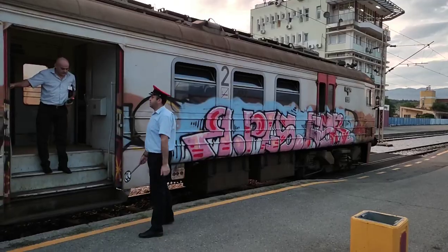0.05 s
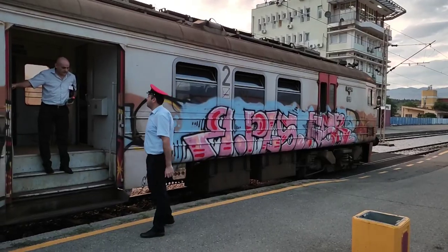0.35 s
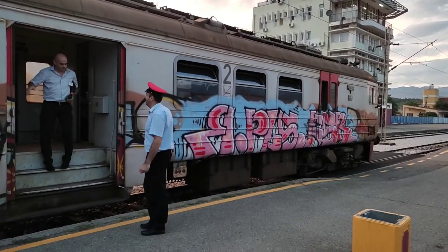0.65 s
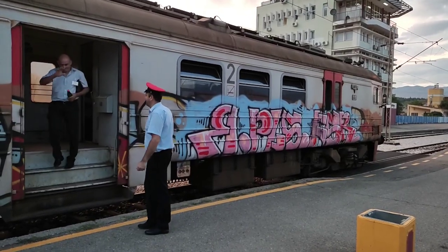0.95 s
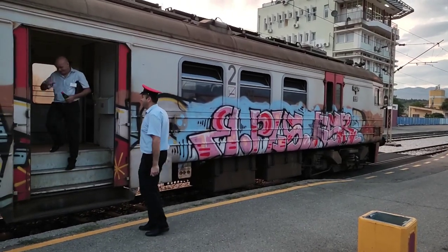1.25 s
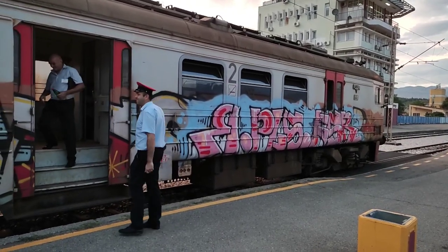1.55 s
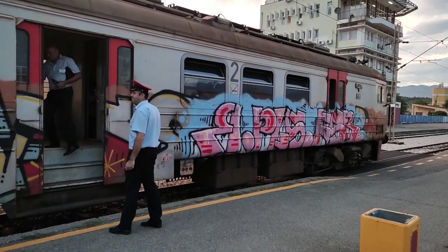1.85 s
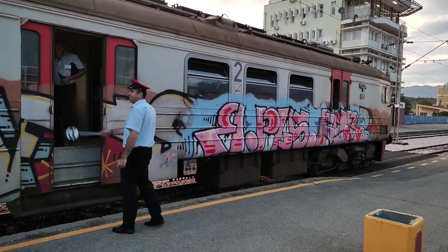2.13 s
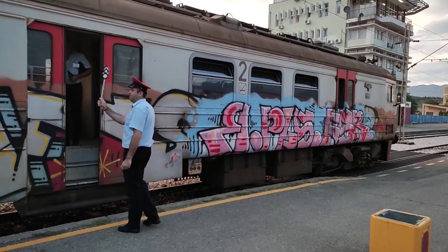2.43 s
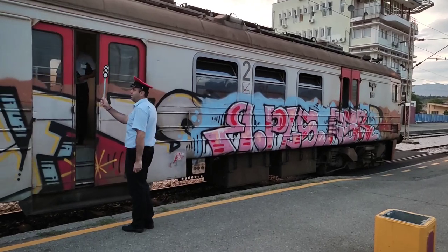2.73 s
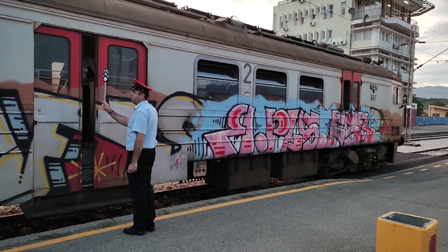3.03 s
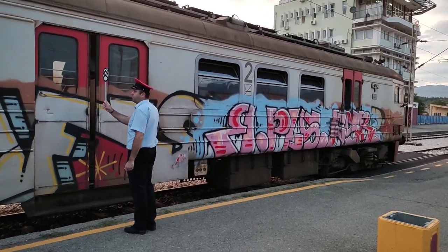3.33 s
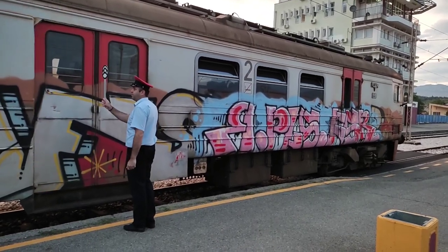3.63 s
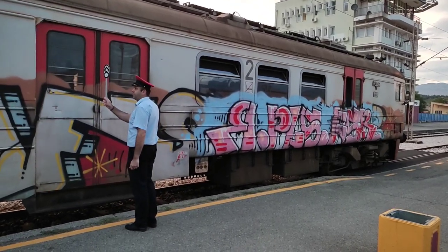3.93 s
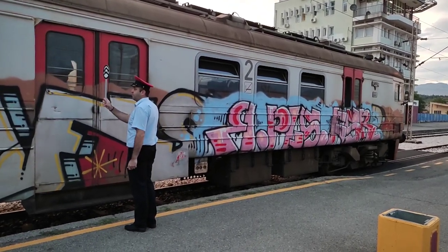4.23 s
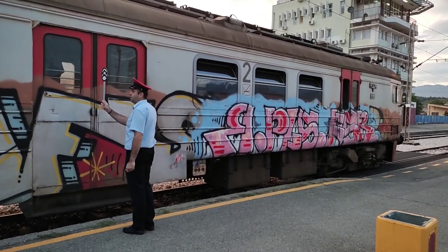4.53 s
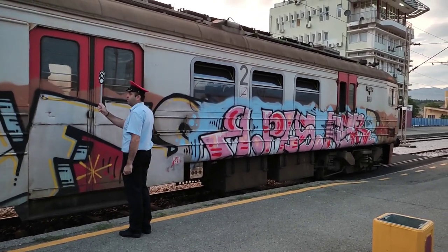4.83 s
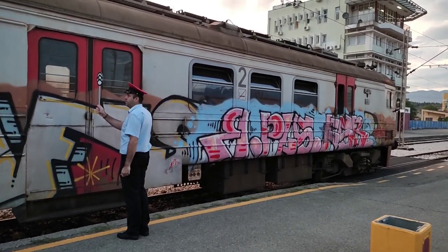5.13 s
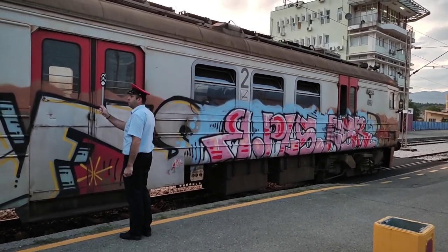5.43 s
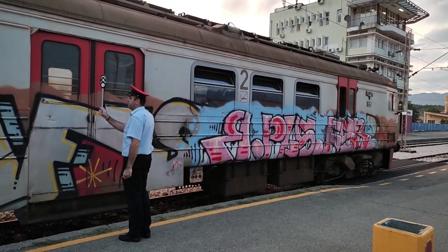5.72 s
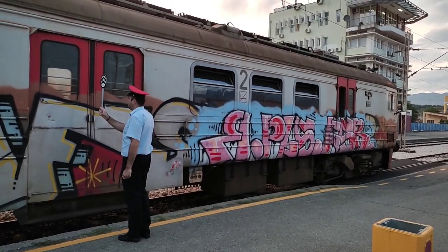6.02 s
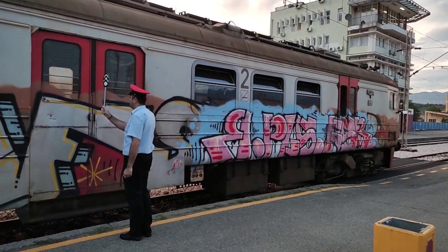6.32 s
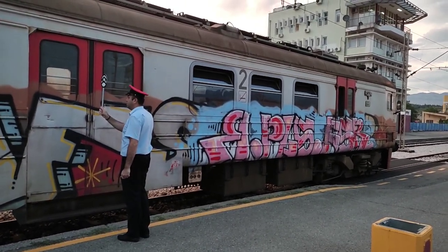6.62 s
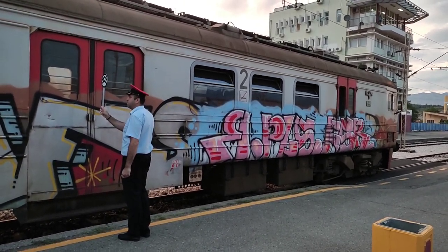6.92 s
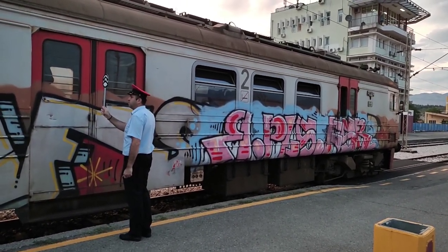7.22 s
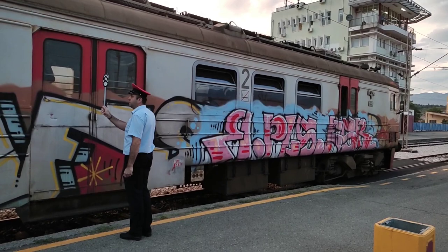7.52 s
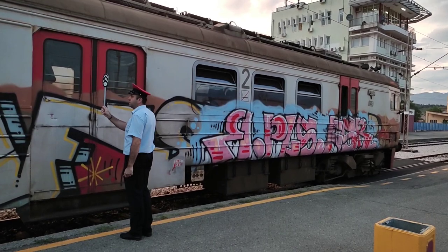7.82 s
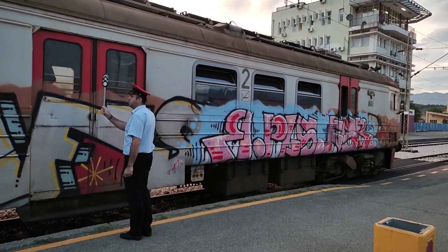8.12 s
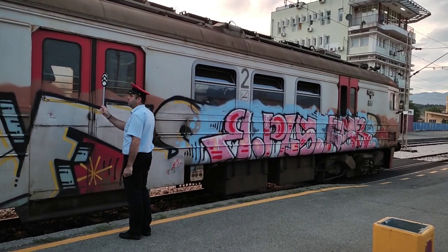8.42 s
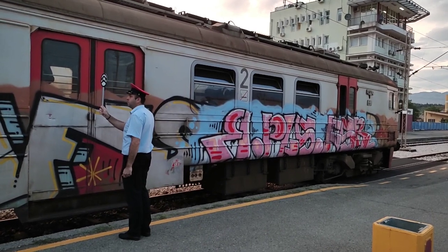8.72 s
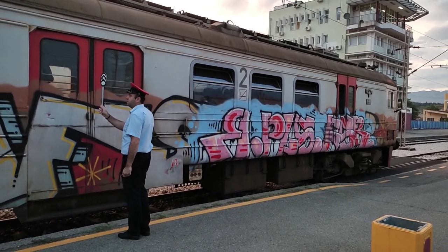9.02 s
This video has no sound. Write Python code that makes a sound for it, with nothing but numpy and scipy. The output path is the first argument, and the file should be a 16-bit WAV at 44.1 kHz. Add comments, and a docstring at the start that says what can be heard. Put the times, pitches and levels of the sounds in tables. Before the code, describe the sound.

An electric train idles with a throbbing hum and blower whine while its sliding doors hiss, squeak and bump shut.

```python
"""An electric railcar idles at an open platform, heard on one microphone a few metres away.
Four auxiliary motors at nearly the same speed beat against each other over a rumble; the electrical
gear buzzes, and a blower rushes through its ducts while its blades whine. The air-driven sliding
doors hiss, squeak along their track and bump shut, closing off the air noise from inside.
The vestibule floor thuds softly, and a thin whistle joins the blower later on."""
import sys
import numpy as np
from scipy import signal
from scipy.fft import irfft
from scipy.io import wavfile

SR = 44100
rng = np.random.default_rng(int(sys.argv[2]) if len(sys.argv) > 2 else 0)


def store_pcm(level_fs):
    """Save levels as 16-bit WAV."""
    pcm = np.round(np.clip(level_fs, -1, 1) * 32767).astype(np.int16)
    wavfile.write(sys.argv[1], SR, np.atleast_2d(pcm).T)


N = 399546
TIME = np.arange(N) / SR
FREQS = np.maximum(np.arange(N // 2 + 1) * SR / N, 1)


def from_db(db):
    """Decibels to gain."""
    return 10 ** (np.asarray(db) / 20)


def rms_one(x):
    """Scale to unit power."""
    return x / np.sqrt(np.mean(x ** 2) + 1e-20)


def in_time(rows):
    """Each column after the first (t/s), interpolated to every sample."""
    times, *columns = np.transpose(rows)
    return [np.interp(TIME, times, column) for column in columns]


def ramp(start_s, length_s):
    """Rises evenly from 0 to 1 and stays there."""
    return np.clip((TIME - start_s) / length_s, 0, 1)


def fade(start_s, db_per_s):
    """Full gain until a given moment, then a steady decay."""
    return from_db(-db_per_s * np.maximum(TIME - start_s, 0))


def swell(start_s, length_s):
    """A rounded rise and fall."""
    return np.sqrt(np.abs(np.sin(np.pi * ramp(start_s, length_s))))


def noise(gain):
    """Unit-power noise shaped by a gain at each frequency."""
    real, imaginary = rng.standard_normal((2, len(FREQS)))
    return rms_one(irfft((real + 1j * imaginary) * gain, N))


def coloured(spectrum):
    """Unit-power noise that follows a spectrum (f/Hz, relative level/dB) and falls away past its ends."""
    hz, db = np.transpose(spectrum)
    ends = np.minimum(1, FREQS / hz[0]) * np.minimum(1, hz[-1] / FREQS)
    return noise(from_db(np.interp(np.log(FREQS), np.log(hz), db)) * ends ** 2)


def resonant(hz, width_hz):
    """Noise gathered around one frequency."""
    return noise(1 / (1 + ((FREQS - hz) / width_hz) ** 2))


def drift(rate_hz):
    """A random wander of unit power, mostly slower than the given rate."""
    return resonant(0, rate_hz)


def sine(hz):
    """Unit-power tone on a steady or moving pitch."""
    return np.sqrt(2) * np.sin(2 * np.pi * (np.cumsum(hz * np.ones(N)) / SR + rng.random()))


def wavering(hz, unsteady, width_hz):
    """A clean tone mixed with narrow noise that makes it waver; unsteady runs from 0 to 1."""
    return np.sqrt(1 - unsteady ** 2) * sine(hz) + unsteady * resonant(hz, width_hz)


def blows(times, levels_db, t60, rise_s):
    """Envelope of a run of blows: each swells quickly on contact and dies away."""
    clicks = np.zeros(N)
    clicks[np.round(times * SR).astype(int)] = from_db(levels_db)
    fall, rise = from_db(-60 / (t60 * SR)), np.exp(-1 / (rise_s * SR))
    decays = signal.lfilter([1], [1, -fall], clicks + 1e-18)
    return signal.lfilter([1 - rise], [1, -rise], decays)


def struck(times, levels_db, modes, rise_s):
    """Blows set a body's clusters of modes ringing."""
    return sum(blows(times, levels_db + db, t60, rise_s) * resonant(hz, width)
               for hz, width, db, t60 in modes)


def motor_tones():
    """One motor tone sings out, swelling and sinking, among others that hold their pitch or waver."""
    # motor tones: f/Hz, level/dB, unsteadiness/0-1
    partials = [(42.2, -59, 0.5), (124, -44, 0.2), (124.2, -47, 0), (126.95, -41, 0.1), (129.6, -43, 0.3),
                (256.8, -50, 0.4), (389, -55, 0.3), (509.3, -56, 0.5), (687, -68.5, .3), (700, -67, 0.3),
                (826, -63.5, 0.8), (885, -65, 0), (1020, -65, 0.3), (1041, -59, 0.4), (1088, -68.5, 0.3),
                (2044, -64.5, 0.2), (2088, -65, 0.4), (2327, -64, 0.1)]
    # swell of the singing tone: t/s, level/dB
    singing_level = [(0, -54), (.75, -50), (1.08, -56.5), (1.55, -49.5), (1.87, -57.5), (2.12, -50),
                     (2.42, -58), (2.6, -53), (3.3, -55.5), (3.6, -51), (4.3, -54), (4.8, -59), (5.5, -53),
                     (6.2, -56.5), (6.95, -55), (7.9, -53.5), (8.2, -51.5), (9, -53.5)]
    tones = sum(from_db(db) * wavering(hz, unsteady, width_hz=2.8) for hz, db, unsteady in partials)
    return tones + from_db(in_time(singing_level)[0]) * sine(hz=681.7)


def motor_throb(in_step_s=8.2, flutter_db=0.66):
    """Four like motors slide in and out of step, so that their summed hum swells and cancels."""
    # hum as the speeds creep: t/s, then f/Hz for each of the four motors
    pitches = [(0, 252.03, 253.79, 254.2, 256.78), (2.25, 252.52, 253.57, 254.04, 256.68),
               (4.5, 252.28, 253.66, 254.33, 256.53), (6.75, 252.19, 253.73, 254.13, 256.76),
               (9, 252.35, 253.39, 254.41, 256.66)]
    # hum of each motor: level/dB
    levels = [-36.5, -36, -37, -38.5]
    cycles = np.cumsum(in_time(pitches), axis=1) / SR
    cycles = cycles - cycles[:, [round(in_step_s * SR)]] + rng.random()  # all four in phase here
    hums = np.sqrt(2) * np.sin(2 * np.pi * cycles)
    return from_db(flutter_db * drift(7.4)) * (from_db(levels) @ hums)


def electrical_buzz(sway_db=0.43):
    """The electrical gear buzzes on multiples of 25 Hz."""
    # lines of the buzz: f/Hz, level/dB
    harmonics = [(200, -41.5), (275, -48.5), (350, -58.5), (375, -54), (500, -67.5), (1375, -67.5),
                 (1575, -65.5), (1625, -73), (1650, -71.5), (1900, -68.5)]
    return sum(from_db(db) * sine(hz) for hz, db in harmonics) * from_db(sway_db * drift(1.7))


def rumble(level_db=-30.5, flutter_db=0.45):
    """The body and underframe shake with the machines."""
    # rumble under the floor: f/Hz, relative level/dB
    spectrum = [(20, -40), (33, -23.5), (48, -9), (68, -1), (105, -1.5), (130, 1), (152, -2), (180, 0),
                (215, 0.5), (256, -7.5), (300, -0.5), (355, -13), (470, -16.5), (800, -42)]
    return from_db(level_db + flutter_db * drift(21)) * coloured(spectrum)


def blower_rush(level_db=-43.5, sway_db=0.92, surge_db=2.2):
    """Cooling air rushes; three broad duct resonances surge and the whine's fourth partial flutters."""
    # cooling air: f/Hz, relative level/dB
    spectrum = [(250, -8), (600, -1.5), (830, 1), (920, -3), (1130, 2), (1400, -6), (1850, -3), (2300, 0.5),
                (2550, -7.5), (3480, -10), (3700, -14), (4450, -27.5), (5700, -24.5), (7300, -26.5)]
    # three broad duct resonances, plus the whine's fourth partial near 3.1 kHz: f/Hz, width/Hz, level/dB
    bands = [(1130, 82, -55.5), (2170, 110, -58.5), (3116, 15, -61.5), (3340, 75, -66)]
    rush = from_db(level_db + sway_db * drift(0.81)) * coloured(spectrum)
    peaks = sum(from_db(db + surge_db * drift(5.3)) * resonant(hz, width) for hz, width, db in bands)
    return rush + peaks


def blower_whine(flutter=0.0019, flicker_db=1.96, shimmer_db=0.7):
    """The blades sing; their speed wanders and the air flow makes pitch and level flutter."""
    # rate at which the blades pass: t/s, f/Hz
    blade_rate = [(0, 772.6), (1.1, 773.4), (2.2, 772.8), (2.9, 773.6), (4.4, 772), (5.25, 775.2),
                  (5.5, 771.3), (6, 774.7), (6.9, 773), (7.7, 770.6), (8.6, 772.8), (9, 772)]
    # partials of the whine: multiple of the blade rate, level/dB
    harmonics = [(1, -58), (2, -51.5), (3, -63), (4, -62), (6, -78.5), (8, -82.5)]
    # swell of the whole whine: t/s, relative level/dB
    swell_curve = [(0, -3.5), (2.3, 0.5), (3.3, -0.7), (5.1, 0), (5.55, -4), (6.1, 1.5), (6.6, 1),
                   (7.7, -1.5), (8.8, 1)]
    swell_db = in_time(swell_curve)[0]
    blade_hz = in_time(blade_rate)[0] * (1 + flutter * drift(35))
    out = np.zeros(N)
    for multiple, db in harmonics:
        gain = from_db(db + swell_db + flicker_db * drift(14))
        shimmer = rms_one(from_db(shimmer_db * np.log2(multiple) * drift(8.4)))  # overtones flutter more
        out += gain * shimmer * sine(multiple * blade_hz)
    return out


def interior_air(level_db=-50.5):
    """Air noise from inside the car reaches the platform until the narrowing doorway shuts it off."""
    # air inside the car: f/Hz, relative level/dB
    spectrum = [(380, -1), (520, 3.5), (630, -4.5), (790, 0), (950, -11.5), (2000, -16.5), (2750, -6),
                (3400, -30)]
    opening = 1 - ramp(start_s=2.4, length_s=1.6)
    return np.sqrt(opening) * from_db(level_db) * coloured(spectrum)


def door_vent(start_s=-0.22, attack_s=0.49, hiss_db=-56.5, flutter_db=2.0, whistle_db=-47):
    """The door cylinder vents with a hiss, whistling only while the pressure is high."""
    # escaping air: f/Hz, relative level/dB
    spectrum = [(2500, -24), (4100, -0.5), (4700, -12.5), (5700, -9.5), (6100, 2), (6900, 4), (7600, -3)]
    flow = ramp(start_s, attack_s) * fade(start_s + attack_s, db_per_s=3)  # sags as the pressure drops
    flow *= fade(start_s=2.85, db_per_s=10)  # dies out as the leaves meet
    hiss = flow * from_db(hiss_db + flutter_db * drift(18)) * coloured(spectrum)
    whistle = from_db(whistle_db) * wavering(hz=1046, unsteady=0.34, width_hz=23)
    return hiss + whistle * fade(start_s=0.3, db_per_s=12.5)


def seal_rubs(flutter_db=2.1):
    """The door seals rub on the frame and excite its bright resonance."""
    # rubbing strokes: t/s, length/s, level/dB
    rubs = [(-.2, 0.96, -56), (.7, 1.5, -61), (2.45, 0.65, -56.5), (4.95, 0.47, -57.5), (5.75, .9, -62)]
    strokes = sum(from_db(db) * swell(start, length) for start, length, db in rubs)
    return strokes * from_db(flutter_db * drift(14)) * resonant(hz=3350, width_hz=380)


def door_squeaks(pitch_jitter=0.013, grip_db=2.2):
    """A sticking runner sings short, slightly gliding notes as it catches and slips."""
    # squeaks of the door and its fittings: t/s, length/s, start f/Hz, end f/Hz, level/dB
    squeaks = [(0.442, 0.17, 1018, 1040, -45.5), (0.585, 0.082, 1008, 965, -47),
               (0.992, 0.018, 4920, 4880, -64), (1.02, 0.05, 4680, 4650, -49),
               (1.053, 0.042, 4280, 4260, -57), (1.07, 0.045, 4630, 4620, -59),
               (1.093, .016, 3300, 3270, -47), (1.114, 0.019, 3200, 3170, -46),
               (1.108, 0.023, 1590, 1640, -43), (1.223, 0.078, 4340, 4230, -50.5),
               (1.325, 0.018, 5000, 4990, -54), (1.345, .018, 5040, 5010, -57),
               (1.308, 0.024, 4240, 4220, -56), (1.372, 0.041, 4180, 4190, -54),
               (1.402, 0.059, 4180, 4160, -55), (3.014, .015, 5550, 5497, -64),
               (3.389, 0.047, 5400, 5500, -52), (3.385, 0.018, 5800, 5680, -54),
               (3.443, 0.026, 5050, 5100, -57), (5.02, 0.1, 830, 850, -47), (5.71, 0.049, 3170, 3152, -53)]
    wobble = 1 + pitch_jitter * drift(300)
    grip = rms_one(from_db(grip_db * drift(80)))
    out = np.zeros(N)
    for start, length, start_hz, end_hz, db in squeaks:
        glide_hz = start_hz + (end_hz - start_hz) * ramp(start, length)
        out += from_db(db) * swell(start, length) * sine(glide_hz * wobble)
    return out * grip


def floor_thuds():
    """Steps and shifting weight thud dully on the vestibule floor."""
    # thuds: t/s, level/dB
    thuds = [(0.765, -36), (2.467, -36), (8.98, -35.5)]
    # ring of the floor: f/Hz, width/Hz, relative level/dB, t60/s
    modes = [(456, 88, -0.5, 0.18), (610, 110, -7, .2), (1020, 180, -4.5, .14)]
    return struck(*np.transpose(thuds), modes, rise_s=0.0055)


def door_knocks():
    """The leaves bump and rebound: the panels ring and loose fittings rattle."""
    # knocks of the leaves: t/s, panel level/dB, rattle level/dB
    knocks = [(2.8555, -41, -46), (3.598, -37, -50), (3.6044, -38.5, -41), (3.62, -42, -51),
              (3.6621, -39.5, -50), (3.719, -51, -54), (4.4966, -64, -50), (6.2622, -53, -49)]
    # ring of the panels: f/Hz, width/Hz, relative level/dB, t60/s
    modes = [(171.05, 64, 3.5, 0.27), (263, 43, 4.5, 0.15), (365, 54, -2.5, 0.18), (496, 100, -7, 0.14),
             (765, 74, -4, 0.14), (1020, 110, -6, 0.14), (1750, 450, -11, 0.15), (3250, 290, -11.5, 0.13)]
    # loose fittings: f/Hz, relative level/dB
    rattle_spectrum = [(1500, -0.5), (3350, 8), (4600, -4), (5500, -9), (6300, 2), (7500, 1)]
    times, panel_db, rattle_db = np.transpose(knocks)
    panels = struck(times, panel_db, modes, rise_s=0.0014)
    rattle = blows(times, rattle_db, t60=0.08, rise_s=0.0015) * coloured(rattle_spectrum)
    return panels + rattle


def latch_snaps():
    """The metal latch snaps and rings briefly as the leaves meet."""
    # snaps: t/s, level/dB
    snaps = [(3.5995, -44), (3.6055, -42), (3.6205, -52), (3.6615, -46)]
    # ring of the latch: f/Hz, width/Hz, relative level/dB, t60/s
    modes = [(6050, 160, -7.5, 0.034), (6720, 240, -5, 0.051)]
    return struck(*np.transpose(snaps), modes, rise_s=0.0006)


def blower_whistle(level_db=-74, start_s=4.3, attack_s=0.5, hold_s=1.9):
    """A thin whistle sets in high above the blower, holds, then fades slowly."""
    envelope = ramp(start_s, attack_s) * fade(start_s + attack_s + hold_s, db_per_s=3)
    return from_db(level_db) * envelope * wavering(hz=7267, unsteady=0.8, width_hz=25)


def platform(direct, wet_db=-9, t60=0.48, delay_s=0.006):
    """Reflections from car side, vestibule and platform follow the direct sound to the microphone."""
    t = TIME[:SR]
    tail = rng.standard_normal(SR) * from_db(-60 * t / t60) * (t > delay_s)
    return direct + from_db(wet_db) * signal.fftconvolve(direct, tail / np.linalg.norm(tail))[:N]


def scene():
    """Machines and doors in mono, from a few metres along the platform."""
    machines = motor_tones() + motor_throb() + electrical_buzz() + rumble()
    blower = blower_rush() + blower_whine() + blower_whistle()
    doors = door_vent() + seal_rubs() + platform(door_squeaks() + door_knocks() + latch_snaps())
    vestibule = floor_thuds() + interior_air()
    return (machines + blower + doors + vestibule)[None]


def record(dry, cutoff_hz=7580):
    """The recorder cuts the top steeply."""
    return signal.sosfilt(signal.ellip(14, .1, 80, cutoff_hz, fs=SR, output="sos"), dry)


dry = scene()
out = record(dry)
store_pcm(out)
```